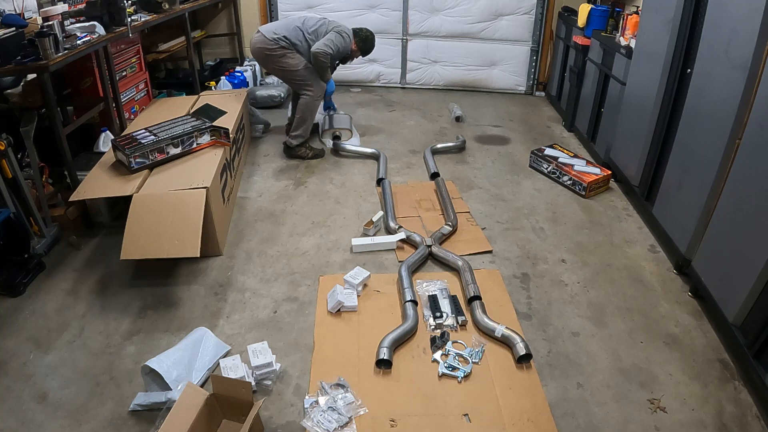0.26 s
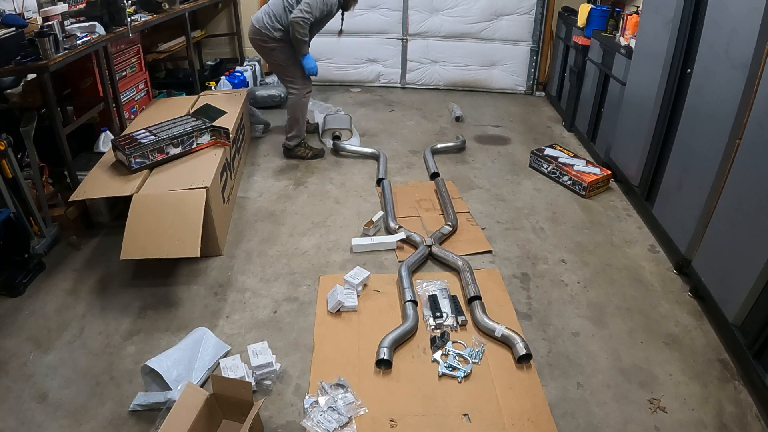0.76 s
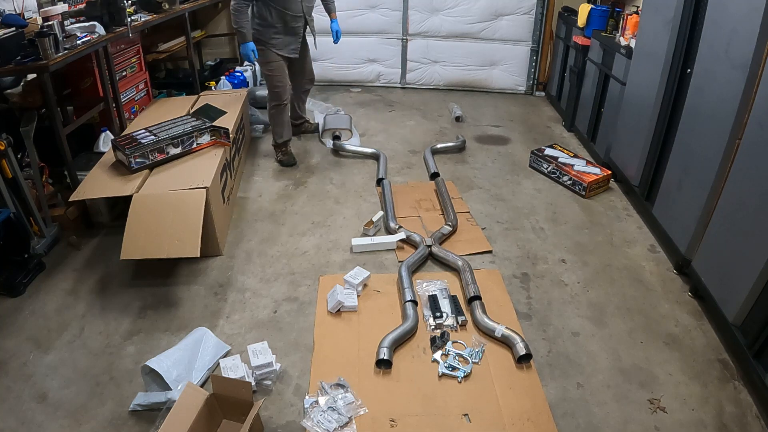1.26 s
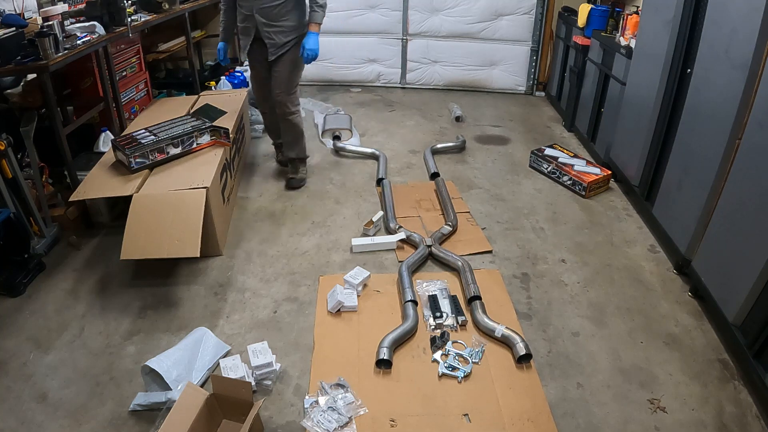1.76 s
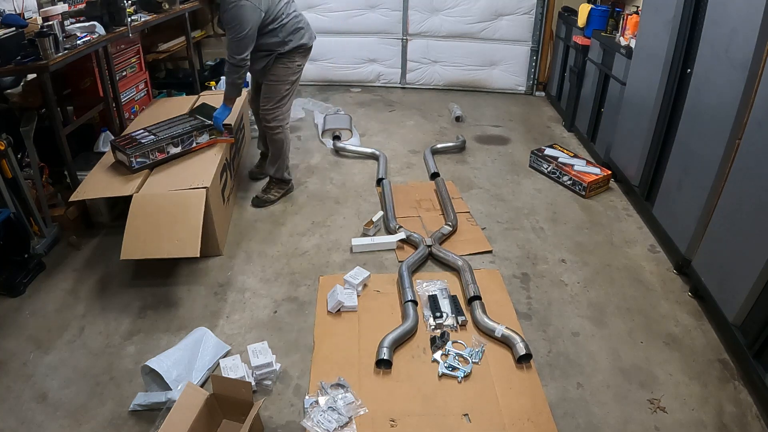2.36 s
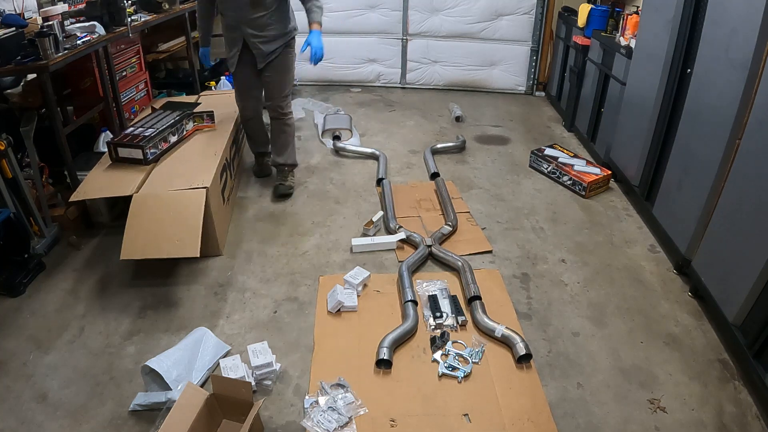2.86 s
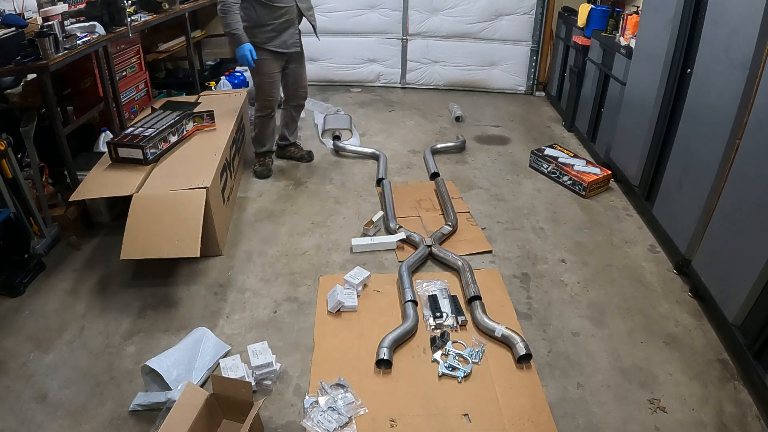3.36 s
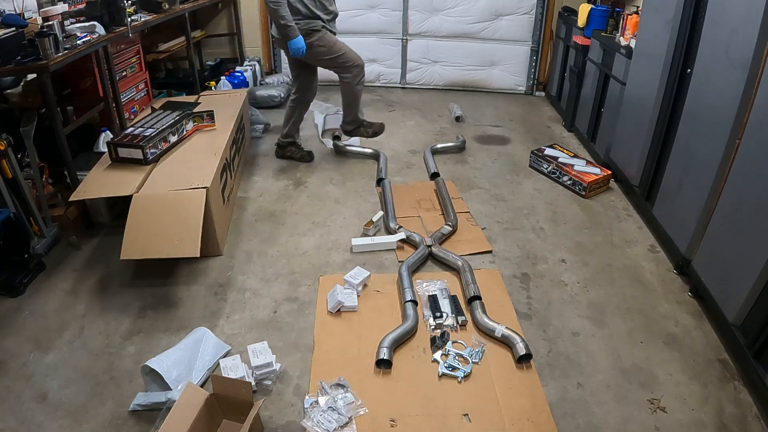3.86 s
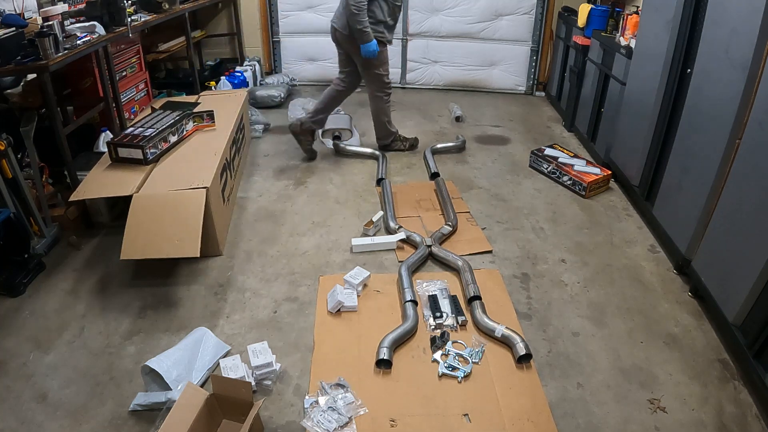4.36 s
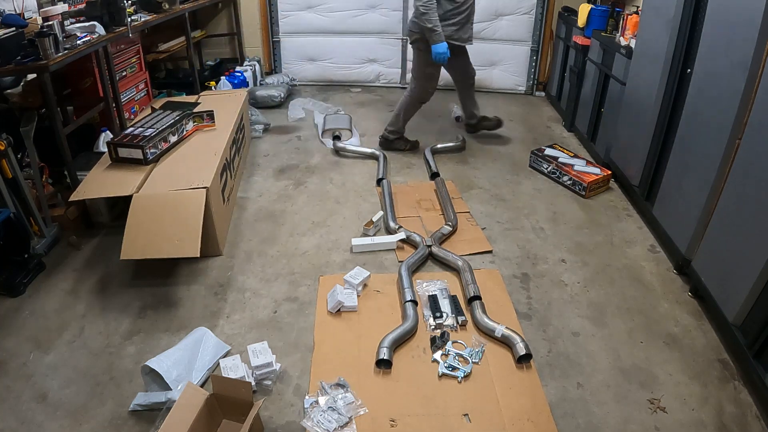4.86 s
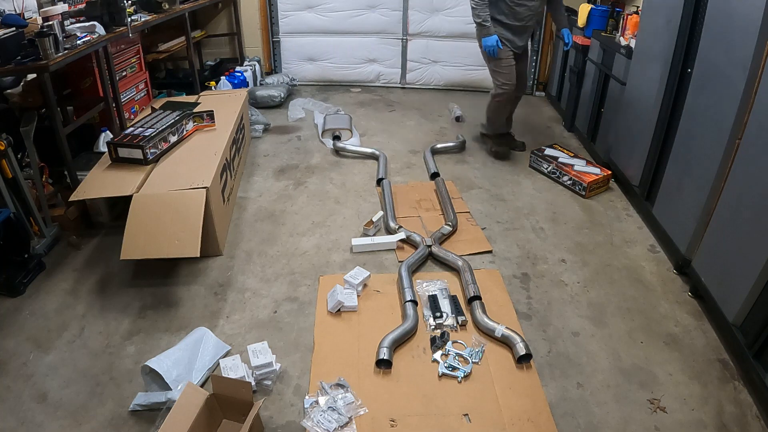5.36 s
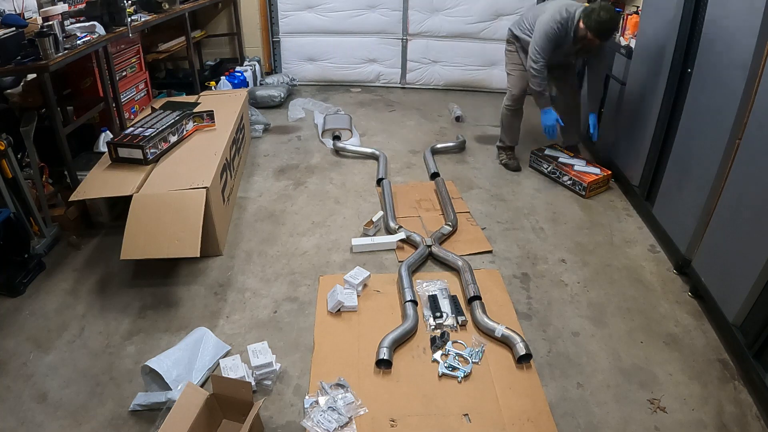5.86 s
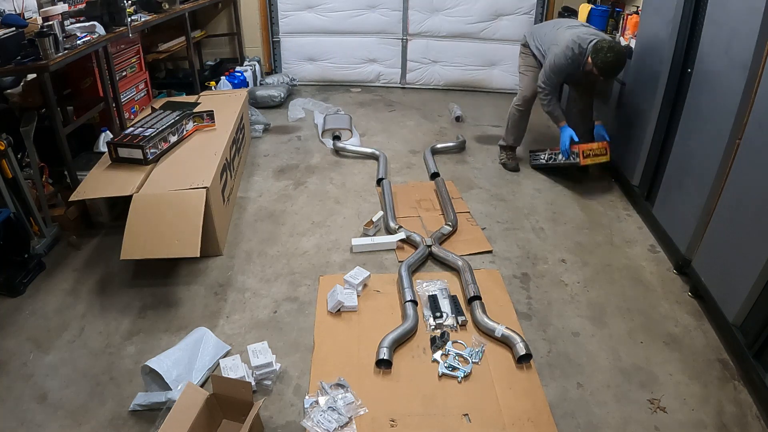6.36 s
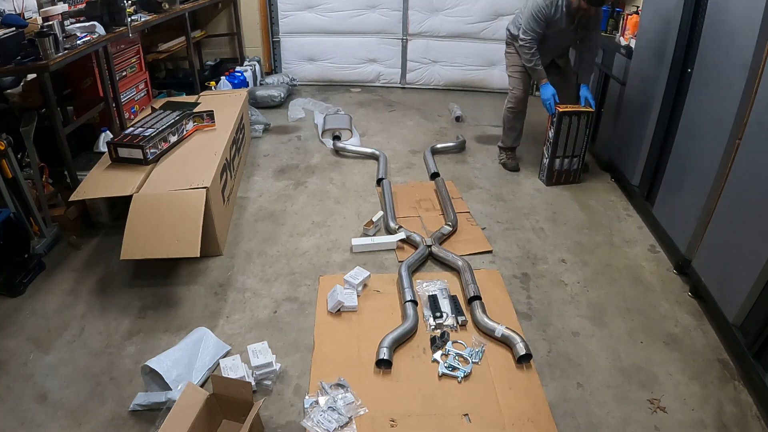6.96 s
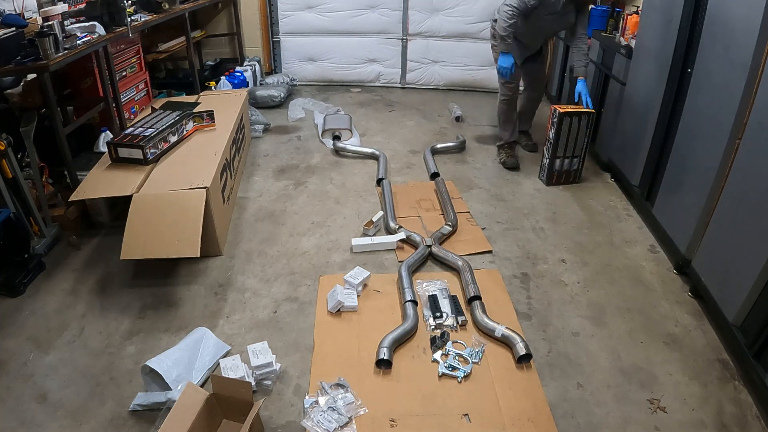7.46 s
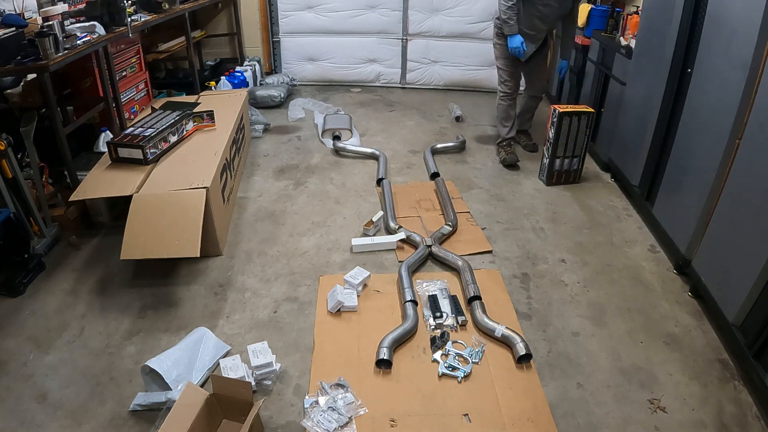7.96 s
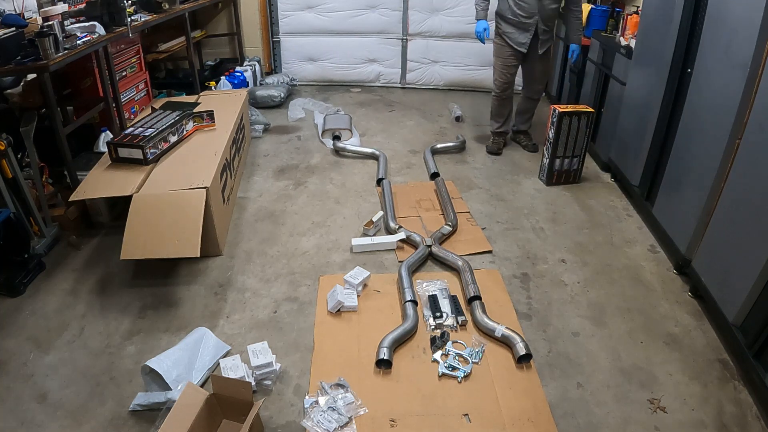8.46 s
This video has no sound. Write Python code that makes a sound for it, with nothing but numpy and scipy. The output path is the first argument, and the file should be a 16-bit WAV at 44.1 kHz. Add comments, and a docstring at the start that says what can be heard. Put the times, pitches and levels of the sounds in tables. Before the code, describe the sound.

Cardboard and wrapping rustle faintly, then a steel exhaust pipe gives a bright clustered clank, its ring cut short by a hand. Shoes scuff on gritty concrete; a carton of parts is shoved and dropped with hollow knocks. Footsteps cross the floor, then another carton is tipped with a thud, scraped and stood on end. Light scuffs finish. Small reverberant garage, faint low hum, microphone a few metres away, nearly mono.

```python
"""A small, hard garage with a faint low hum, heard by a nearly mono microphone a few metres from the exhaust parts.
Cardboard and wrapping rustle as filtered stick-slip clicks; a steel pipe, a set of decaying sines, clanks and is gripped.
Then shoes scuff, step and tap on gritty concrete as rasps and noise bursts, and a carton of parts is shoved and dropped.
Later another carton is tipped, dragged and stood on end: panel tones and noise for the blows, a rasp for the drag."""
import sys
import numpy as np
from scipy import signal
from scipy.fft import rfft, irfft
from scipy.io import wavfile

SR = 44100
rng = np.random.default_rng(int(sys.argv[2]) if len(sys.argv) > 2 else 0)


def file_out(sig):
    """Save sig as 16-bit WAV at sys.argv[1]."""
    # one column per channel
    cols = np.atleast_2d(sig).T
    # limit, then scale
    lim = np.clip(cols, -1, 1)
    pcm = np.round(lim * 32767).astype(np.int16)
    wavfile.write(sys.argv[1], SR, pcm)


N = 383216

# All source levels are taken at the source, before the room and the microphone.
# Spectrum of still room air. Each row: frequency [Hz], relative density [dB per Hz].
AIR_SPECTRUM = [(15, -72), (25, -12), (58, -32.5), (128, -5), (171, -5), (200, -3), (305, -6.5), (672, -8),
                (728, -9.5), (898, -11.5), (2790, -15.5), (6140, -25.5), (9120, -34.5), (11300, -41.5),
                (13500, -46.5)]
AIR_DB = -55
# Swell of the low hum. Each row: time [s], level [dB].
HUM_SWELL = [(0, -63.5), (3.3, -65.5), (4.7, -57), (5.7, -63.5), (7.7, -63.5), (8.69, -68)]
# Spectrum of the hum. Each row: frequency [Hz], relative density [dB per Hz].
HUM_SPECTRUM = [(30, -20), (55, -7), (70, 3), (85, -8), (120, -3), (145, 0), (190, -10), (400, -30), (2000, -60)]

# Cardboard and wrapping rubbed.
# Each row: peak time [s], width at half of peak level [s], peak level [dB], low edge [Hz].
RUBS = [(.02, 0.063, -42, 950), (.12, 0.088, -45.5, 1190), (.275, .11, -41.5, 557), (.38, 0.11, -38.5, 710),
        (2.358, 0.052, -30.5, 1300), (2.462, 0.026, -33.5, 1000), (2.62, 0.31, -43.5, 750),
        (2.932, 0.062, -36, 1490), (3.025, 0.043, -39, 1950), (6.035, 0.045, -30, 1860),
        (6.07, 0.052, -31.5, 1480), (6.33, 0.12, -43.5, 1200), (6.801, 0.04, -23, 1080),
        (6.88, 0.12, -57, 500), (7.08, 0.06, -43.5, 1240)]
# Hiss of rubbed cardboard. Each row: frequency [Hz], relative density [dB per Hz].
CARDBOARD = [(100, -18), (400, 11), (1100, -4.5), (1600, -1.5), (3000, 1.5), (5000, 0.5), (8000, -5.5),
             (12000, -8.5)]
# Resonances that colour a rubbed carton. Each row: frequency [Hz], width [Hz], gain [dB].
SHELL = [(408, 59, 0.5), (1200, 81, 0), (3300, 300, -27)]

# Wall modes of the steel pipe. Each row: frequency [Hz], relative level [dB], ungripped decay t60 [s].
PIPE_MODES = [(855, -24.5, 1.6), (1024.5, -7.5, .8), (1814.3, -2.5, .46), (1857, -9, .33),
              (2381.5, -5, .45), (2652, -1.5, .4), (2945, -24, .4), (3050, -13, .2), (3100, -1.5, .38),
              (3180, -16, .18), (3795, -11, .4), (4667, -7.5, .27), (4861, -11, .24), (5365, -13, .2),
              (5689, -12, .2), (5975, -13, .2), (6735, -21, .17), (7461, -27, .17), (7975, -27, .15)]
# Pipe contacts. Each row: start [s], ring at 2 kHz [dB], ring tilt [dB per octave], clash level [dB].
CLANKS = [(0.444, -20.5, 1, -15), (.464, -17, -4, -33), (0.51, -17, -3, -23), (0.532, -43, -7, -26),
          (0.553, -22.5, -2, -28)]
GRIP_S, GRIP_T60_S = .575, .45  # the hand closes; the extra decay it gives at 2 kHz
# Steel on steel. Each row: frequency [Hz], relative density [dB per Hz].
CLASH = [(200, -24), (1000, -9.5), (2200, -11), (3100, 3.5), (4200, -12.5), (5600, -10), (7000, -19), (12000, -34.5)]
# Pipe end on the floor. Each row: frequency [Hz], relative density [dB per Hz].
BUMP = [(50, -45), (150, -10), (400, -10), (540, 3), (700, -25), (3000, -80)]

# Sole scuffs. Each row: peak time [s], width at half of peak level [s], peak level [dB], low edge [Hz].
SCUFFS = [(1.115, 0.09, -39.5, 1600), (1.215, 0.077, -33, 1590), (1.335, 0.13, -50, 1640),
          (1.535, 0.08, -51.5, 1350), (2.002, 0.043, -25.5, 2200), (2.13, 0.12, -42, 1230),
          (3.338, 0.038, -47.5, 1990), (3.51, 0.17, -49.5, 1180), (3.98, 0.19, -58, 890),
          (4.38, 0.32, -51.5, 1140), (5.175, 0.087, -37, 1030), (5.572, 0.028, -19, 2350),
          (5.68, 0.062, -35.5, 1050), (7.325, 0.099, -40, 1210), (7.504, 0.055, -24.5, 2300),
          (8.18, 0.067, -45.5, 2030), (8.36, 0.2, -37.5, 900), (8.47, .1, -30, 1410),
          (8.675, 0.13, -40.5, 1500)]
# Hiss of gritty concrete. Each row: frequency [Hz], relative density [dB per Hz].
GRIT = [(100, 1), (400, 8.5), (1000, 0.5), (2500, 1.5), (4000, 1.5), (6000, -2.5), (8000, -6.5),
        (12000, -10.5)]
# Slips that chatter. Each row: peak time [s], width at half of peak level [s], peak level [dB], centre [Hz].
CHATTER = [(1.98, .015, -31.5, 2380), (2.431, 0.046, -27.5, 2600), (3.028, 0.036, -38, 2820),
           (5.69, 0.01, -34, 1240), (7.305, .017, -33, 1350), (7.449, 0.017, -41, 2760)]
CHATTER_SPREAD = 1.27  # band edges lie this factor either side of the centre
# Share of a stroke's width before its peak: a sole rolls on, cardboard catches sooner, a chatter abruptly.
SOLE_RISE_SHARE, CARD_RISE_SHARE, CHATTER_RISE_SHARE = .45, .28, .17
# Shorter strokes are brighter: top edge [Hz] at a width of STROKE_S, and the exponent it follows.
STROKE_S, STROKE_HIGH_HZ, HIGH_FOLLOW = .055, 7270, .19
# A light drag underlies each stroke from touchdown, this many rise times before the peak, and trails off.
TRAIL_DB, TRAIL_T60_S, TOUCH_RISES = -14, .45, 2.47

# Footfalls and small taps. Each row: start [s], thud level [dB], click level [dB].
STEPS = [(2.085, -41, -50), (2.895, -60, -42), (3.357, -39, -64), (4.287, -35, -56), (5.096, -32, -35.5),
         (5.158, -35.5, -35), (5.544, -37.5, -23), (5.895, -49, -42), (5.958, -29.5, -37.5),
         (7.049, -57, -38), (7.309, -49, -33.5), (7.535, -41, -73), (7.691, -66, -44), (8.315, -36.5, -63),
         (8.35, -31.5, -53), (8.384, -34, -32.5)]
# Dull thud on concrete. Each row: frequency [Hz], relative density [dB per Hz].
THUD = [(30, -22), (70, -21), (130, -1.5), (220, 1), (400, -3.5), (700, -3.5), (1300, -9.5), (3000, -18.5),
        (12000, -51)]
# Grit click or hard carton edge. Each row: frequency [Hz], relative density [dB per Hz].
CRACK = [(30, -28), (100, -23.5), (500, 4), (1200, 12), (2000, 8), (3200, 8), (5000, 4), (8000, -3.5),
         (12000, -15.5)]

# Carton landings. Each row: start [s], body level [dB], softness corner [Hz], crack level [dB],
# decay t60 of the hollow [s] (the crack and panel ring for a share of it), settling re body [dB].
KNOCKS = [(2.419, -33, 1090, -29.5, 0.51, -1), (2.466, -36.5, 1100, -26, 0.19, -14),
          (2.517, -33.5, 564, -48, 0.14, -28), (2.546, -22.5, 1296, -48, 0.075, -5),
          (2.711, -23, 830, -30, 0.26, -9), (2.742, -18, 1680, -25.5, 0.13, 0),
          (6.284, -27.5, 1107, -27.5, 0.26, -13.5), (6.302, -18, 1220, -28, 0.092, -18),
          (6.778, -40, 2500, -12, 0.025, -12), (6.791, -31.5, 1618, -15.5, 0.14, 1),
          (6.946, -31, 680, -37, 0.083, -26), (6.970, -63, 493, -21, 0.082, -14),
          (7.222, -50, 717, -68, .16, -23)]
# Hollow inside of a carton. Each row: frequency [Hz], relative density [dB per Hz].
HOLLOW = [(30, -55), (70, -22), (110, -1), (150, -1), (200, 1.5), (280, 1.5), (560, 0.5), (750, -3.5),
          (1000, -4), (1500, -9), (4000, -4.5), (12000, -40)]
# The load settles later and duller (share of the corner); a harder blow flexes a higher part of the panel.
SETTLE_S, SETTLE_SOFTNESS, PANEL_PITCH_SHARE = .025, .39, .44

# Carton edge dragged over the floor as it is tipped up. Each row: time [s], level [dB].
DRAG = [(6.41, -50), (6.444, -28), (6.536, -22), (6.596, -23), (6.636, -29.5), (6.688, -54), (6.76, -47)]
DRAG_LOW_HZ, DRAG_HIGH_HZ = 810, 6150
# Panel resonances of the dragged carton. Each row: frequency [Hz], width [Hz], gain [dB].
DRAG_MODES = [(1093, 130, 5.5), (3100, 290, -6), (4100, 180, -8), (5200, 230, -9)]

# Standing waves of the garage. Each row: frequency [Hz], width [Hz], gain [dB].
ROOM_MODES = [(119, 34, -1.5), (196.4, 34, 5), (281, 18, -1), (308, 28, -2.5), (352, 48, -3.5),
              (502, 24, -4), (565, 27, -4), (713, 20, -13)]
# Response of the microphone ports. Each row: frequency [Hz], gain [dB].
PORTS = [(7000, .5), (8300, -5), (8850, -10), (9020, -15), (9250, -8), (10000, -.5), (11800, 8), (13000, 2),
         (13700, -24)]
TOP_HZ = 13700  # steep upper limit of the microphone


def undb(db):
    """Decibels to gain."""
    return 10 ** (np.asarray(db) / 20)


def unit(x):
    """Scale to rms 1."""
    return x / np.sqrt(np.mean(x ** 2))


def fade(t, t60):
    """Exponential decay by 60 dB in t60 seconds."""
    return np.exp(-np.log(1000) * t / t60)


def colour(x, points):
    """Causal filter through (Hz, dB) points, built by folding the cepstrum into minimum phase."""
    hz, db = np.transpose(points)
    size = 4096
    f = np.maximum(np.arange(size // 2 + 1) * SR / size, 1)
    gain = undb(np.interp(np.log(f), np.log(hz), db))
    cepstrum = irfft(np.log(gain))
    cepstrum[1:size // 2] *= 2
    cepstrum[size // 2 + 1:] = 0
    response = irfft(np.exp(rfft(cepstrum)))
    return signal.fftconvolve(x, response)[:len(x)]


def edge(x, hz, kind, order=2):
    """Low-pass or high-pass."""
    return signal.sosfilt(signal.butter(order, hz, kind, fs=SR, output="sos"), x)


def walk(size, rate):
    """Random wander through `rate` knots per second, spread near 1."""
    knots = np.arange(size) * rate / SR
    return np.interp(knots, np.arange(size // 20), rng.standard_normal(size // 20))


def add(out, s, x):
    """Mix x in from time s, cutting what lies outside."""
    i = int(s * SR)
    x, i = x[max(-i, 0):], max(i, 0)
    out[i:i + len(x)] += x[:len(out) - i]


def burst(t, points, t60):
    """Decaying coloured noise: countless short, overlapping modes after a blow."""
    return unit(colour(rng.standard_normal(len(t)), points)) * fade(t, t60)


def resonate(x, modes):
    """The sound itself plus the resonances that it drives."""
    ringing = 0
    for hz, width, db in modes:
        b, a = signal.iirpeak(hz, hz / width, fs=SR)
        ringing = ringing + undb(db) * signal.lfilter(b, a, x)
    return x + ringing


def rasp(size, points, low_hz, high_hz, grain_rate, grain_db, judder_db, judder_hz, smooth_db, order=2):
    """Stick-slip clicks of unequal size over smooth noise, under a juddering pressure."""
    slips = (rng.random(size) < grain_rate / SR) * rng.standard_normal(size)
    strength_db = grain_db * np.minimum(rng.exponential(size=size), 4)
    slips = unit(slips * undb(strength_db))
    x = colour(slips + undb(smooth_db) * rng.standard_normal(size), points)
    band = edge(edge(x, low_hz, "high", order), high_hz, "low", order)
    return unit(band) * undb(judder_db * walk(size, judder_hz))


def pressure(length, rise_share):
    """One second of a stroke that peaks in the middle: it touches down, swells, lets go and trails off."""
    t = np.arange(SR) / SR - .5
    rise, fall = length * rise_share, length * (1 - rise_share)
    steepness = np.where(t < 0, np.abs(t / rise) ** 2, np.abs(t / fall) ** 1.6)
    swell = np.exp(-.7 * steepness)  # about half level one rise before and one fall after the peak
    touch = np.clip(2 * (t / rise + TOUCH_RISES), 0, 1)
    trail = undb(TRAIL_DB) * fade(np.maximum(t, 0), TRAIL_T60_S)
    return touch * np.maximum(swell, trail)


def friction(strokes, points, rise_share, **surface):
    """Strokes over one surface; the shorter the stroke, the higher its hiss reaches."""
    out = np.zeros(N)
    for s, length, db, low_hz in strokes:
        high_hz = STROKE_HIGH_HZ * (STROKE_S / length) ** HIGH_FOLLOW
        hiss = rasp(SR, points, low_hz, high_hz, **surface)
        add(out, s - .5, undb(db) * pressure(length, rise_share) * hiss)
    return out


def background():
    """Coloured noise of still room air, with a low noise hum that swells slowly."""
    air = unit(colour(rng.standard_normal(N), AIR_SPECTRUM)) * undb(AIR_DB + .067 * walk(N, 18))
    hum = unit(colour(rng.standard_normal(N), HUM_SPECTRUM))
    swell_db = np.interp(np.arange(N) / SR, *np.transpose(HUM_SWELL))
    return air + hum * undb(swell_db)


def card_rubs():
    """Cardboard and wrapping catch and slip in sparse clicks over a smooth hiss."""
    return friction(RUBS, CARDBOARD, CARD_RISE_SHARE,
                    grain_rate=1600, grain_db=1, judder_db=1.5, judder_hz=145.8, smooth_db=2)


def pipe(waver_db=3, bump_db=-10, bump_t60=.13):
    """Each contact feeds the wall modes; they waver as the pipe rocks and die faster in the grip."""
    out, t = np.zeros(N), np.arange(SR) / SR
    start = CLANKS[0][0]
    build_s, waver_hz, clash_t60 = .003, 55, .13
    held = np.maximum(t + start - GRIP_S, 0)
    for hz, db, t60 in PIPE_MODES:
        energy = 0
        for s, ring_db, tilt_db, _ in CLANKS:
            age = np.maximum(t + start - s, 0)
            drive = undb(ring_db + tilt_db * np.log2(hz / 2000))
            ring = drive * (1 - np.exp(-age / build_s)) * fade(age, t60)
            energy = energy + ring ** 2
        # short waves feel the rocking and the grip more than long ones
        touch = np.sqrt(hz / 2000)
        waver = undb(db + waver_db * touch * walk(SR, waver_hz))
        size = np.sqrt(energy) * waver * fade(held * touch, GRIP_T60_S)
        add(out, start, size * np.sin(2 * np.pi * (hz * t + rng.random())))
    # steel on steel clashes brightly; the pipe's end bumps the floor
    for s, _, _, clash_db in CLANKS:
        contact = burst(t, CLASH, clash_t60) + undb(bump_db) * burst(t, BUMP, bump_t60)
        add(out, s, undb(clash_db) * contact)
    return out


def sole_scuffs():
    """Soles roll onto gritty concrete and slide in dense clicks."""
    return friction(SCUFFS, GRIT, SOLE_RISE_SHARE,
                    grain_rate=4500, grain_db=1.7, judder_db=2, judder_hz=119.8, smooth_db=.5)


def chatters():
    """A contact catches abruptly and chatters in a narrow band."""
    out = np.zeros(N)
    for s, length, db, hz in CHATTER:
        x = rasp(SR, GRIT, hz / CHATTER_SPREAD, hz * CHATTER_SPREAD, grain_rate=1200, grain_db=2,
                 judder_db=2, judder_hz=150, smooth_db=-3, order=6)
        add(out, s - .5, undb(db) * pressure(length, CHATTER_RISE_SHARE) * x)
    return out


def steps_and_taps(thud_t60=.13, click_t60=.14):
    """A footfall or small tap thuds on concrete and the grit under it clicks."""
    out, t = np.zeros(N), np.arange(SR // 3) / SR
    for s, thud_db, click_db in STEPS:
        thud = undb(thud_db) * burst(t, THUD, thud_t60)
        click = undb(click_db) * burst(t, CRACK, click_t60)
        add(out, s, thud + click)
    return out


def carton_blow(t, soft_hz, t60, panel_db=-3, panel_share=.58, flex_s=.0018):
    """A blow flexes a panel and stirs the hollow; a soft one leaves the highs out."""
    panel = np.sin(2 * np.pi * PANEL_PITCH_SHARE * soft_hz * t) * fade(t, t60 * panel_share)
    body = edge(undb(panel_db) * panel + burst(t, HOLLOW, t60), soft_hz, "low")
    body = body * (1 - np.exp(-t / flex_s))
    return body / np.std(body[:SR // 40])  # level is set over the first 25 ms


def cartons(crack_share=.64):
    """A carton lands with a body blow and the crack of a hard edge, then its load settles more dully."""
    out, t = np.zeros(N), np.arange(SR // 2) / SR
    for s, body_db, soft_hz, crack_db, t60, settle_db in KNOCKS:
        crack = undb(crack_db) * burst(t, CRACK, t60 * crack_share)
        add(out, s, undb(body_db) * carton_blow(t, soft_hz, t60) + crack)
        settling = carton_blow(t, SETTLE_SOFTNESS * soft_hz, t60)
        add(out, s + SETTLE_S, undb(body_db + settle_db) * settling)
    return out


def drag():
    """The carton's edge scrapes along the concrete and sets its panels ringing."""
    x = rasp(N, CARDBOARD, DRAG_LOW_HZ, DRAG_HIGH_HZ,
             grain_rate=2500, grain_db=-1, judder_db=2, judder_hz=156, smooth_db=-.5)
    # silent before the first row and after the last
    db = np.interp(np.arange(N) / SR, *np.transpose(DRAG), left=-np.inf, right=-np.inf)
    return unit(resonate(x, DRAG_MODES)) * undb(db)


def garage(x, wet_db):
    """Direct sound plus dense reflections off floor, cabinets and door, as a decaying noise tail."""
    t60_low, t60_high, build_s = .34, .37, .00074
    t = np.arange(SR // 2) / SR
    noise = rng.standard_normal(len(t))
    low = edge(noise, 1600, "low", order=1)
    tail = low * fade(t, t60_low) + (noise - low) * fade(t, t60_high)
    tail = tail * (1 - np.exp(-t / build_s))
    echo = signal.fftconvolve(x, tail / np.linalg.norm(tail))[:N]
    return (x + undb(wet_db) * echo) / np.hypot(1, undb(wet_db))


def scene():
    """All sources in the room; only the top treble differs between the two ports."""
    air = background()
    card = resonate(card_rubs() + drag(), SHELL)
    clank = garage(pipe(), wet_db=-13)
    rubbing = garage(sole_scuffs() + card + chatters(), wet_db=-11)
    blows = garage(resonate(cartons() + steps_and_taps(), ROOM_MODES), wet_db=-4.5) * undb(-1.5)
    mid = clank + blows + rubbing + air
    side = undb(-9.5) * edge(garage(mid, wet_db=1), 10350, "high", order=6)
    return np.array([mid + side, mid - side])


def record(dry):
    """The microphone thins the deep bass, its ports cancel a narrow treble band; the top is cut steeply."""
    ported = np.array([colour(channel, PORTS) for channel in dry])
    thinned = edge(ported, 59, "high", order=3)
    top_cut = signal.ellip(8, .2, 70, TOP_HZ, fs=SR, output="sos")
    return signal.sosfilt(top_cut, thinned)


dry = scene()
out = record(dry)
file_out(out)
```